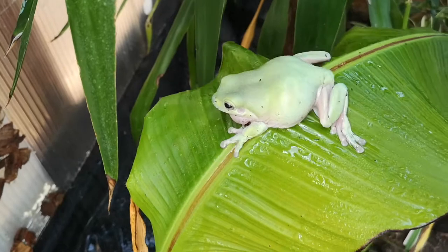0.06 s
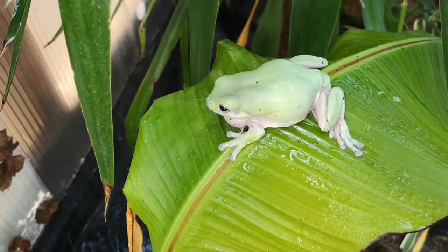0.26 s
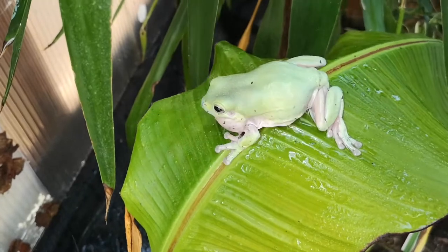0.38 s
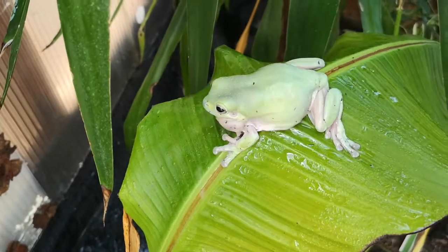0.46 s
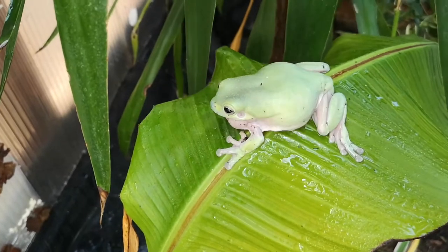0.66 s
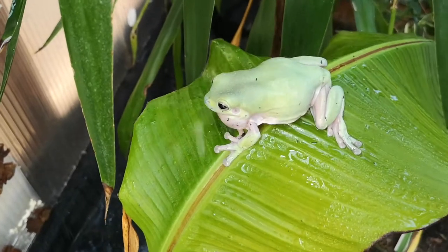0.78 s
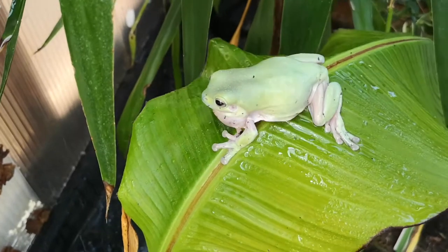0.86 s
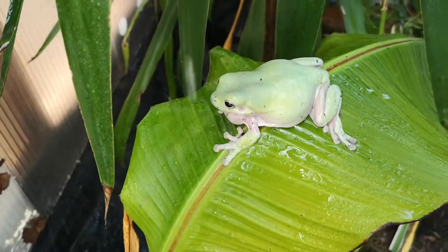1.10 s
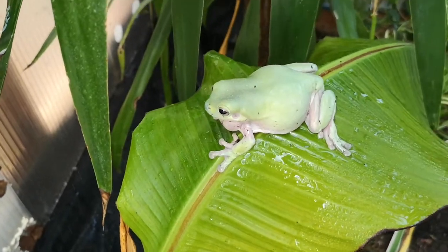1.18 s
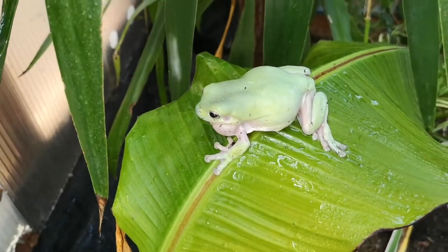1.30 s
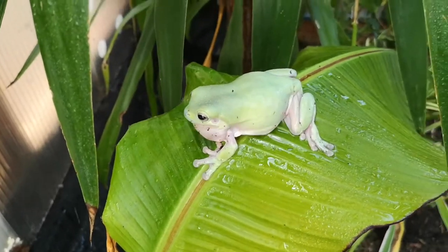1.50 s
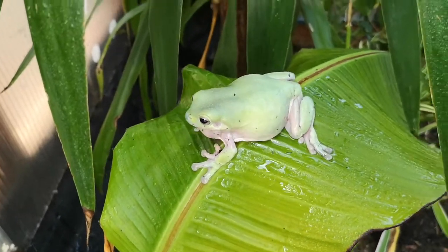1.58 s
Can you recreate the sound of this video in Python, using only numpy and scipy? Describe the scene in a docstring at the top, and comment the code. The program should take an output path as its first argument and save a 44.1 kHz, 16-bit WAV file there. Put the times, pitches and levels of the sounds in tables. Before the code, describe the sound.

A frog gives three short, harsh croaks at even intervals, close to the microphone in a small room. Water hisses steadily behind it, with a few faint splashes between the croaks and a low rumble underneath.

```python
"""A tree frog on a big leaf croaks three times, close to a stereo camera in a small damp room.
Each croak is a train of laryngeal clicks, about 160 a second, that swells, then slows and fades.
The clicks ring throat and vocal sac and come back from nearby surfaces. Water hisses steadily with
a few small splashes; a low rumble drifts under it. The camera's gain dips under each croak."""
import sys
import numpy as np
from scipy import signal
from scipy.fft import rfft, irfft, next_fast_len
from scipy.io import wavfile
from scipy.ndimage import uniform_filter1d

SR = 44100
rng = np.random.default_rng(int(sys.argv[2]) if len(sys.argv) > 2 else 0)


def generate_wav(signal):
    """Clip the signal to [-1, 1] and save it as 16-bit WAV at the path in sys.argv[1]."""
    frames = np.transpose(np.atleast_2d(signal))
    scaled = np.clip(frames, -1, 1) * 32767
    pcm = np.round(scaled).astype(np.int16)
    wavfile.write(sys.argv[1], SR, pcm)


N = 72765


def frog():
    """Three croaks in the room; the right microphone gets them later, coloured by the leaf."""
    # per croak: t/s, click rate/Hz
    rates = [
        [(0.1623, 103.5), (0.2301, 188.4), (0.2366, 133.0), (0.2533, 139.4), (0.2654, 186.3), (0.2791, 165.7),
         (0.2946, 163.5), (0.2995, 174.1), (0.314, 179.5), (0.3314, 155.6), (0.3518, 109.0), (0.383, 72.5)],
        [(0.6389, 117.7), (0.6967, 120.8), (0.7047, 225.5), (0.7189, 107.7), (0.7409, 157.0), (0.7498, 147.0),
         (0.7554, 167.1), (0.7592, 182.3), (0.768, 166.3), (0.7947, 168.3), (0.8071, 87.0), (0.866, 81.0)],
        [(1.206, 93.4), (1.2483, 179.2), (1.2543, 124.6), (1.2726, 131.1), (1.2826, 185.3), (1.3113, 130.3),
         (1.3191, 163.0), (1.3298, 171.9), (1.3364, 160.6), (1.3684, 140.2), (1.3938, 132.3), (1.437, 77.4)],
    ]
    # per croak: t/s, throat level/dB, rasp re throat/dB, sac re throat/dB (all before trims)
    efforts = [
        [(.15, -61, -16, 3), (.168, -38.5, -31, -6), (.207, -46.5, -33, 7), (.221, -26, -17.5, -6.5),
         (.274, -15.5, -17, -11.5), (.333, -23, -13, -5.5), (.344, -37.5, -15, -2.5), (.372, -39.5, -29, -0.5),
         (.385, -68, -11, -4)],
        [(.637, -49, -18, 8), (.682, -35.5, -19, -1.5), (.698, -19.5, -16.5, -11.5), (.732, -17.5, -16.5, -7.5),
         (.765, -15.5, -13, -11.5), (.797, -21.5, -13, -2.5), (.807, -32.5, -11, -1), (.822, -28, -9, -1),
         (.864, -49.5, -2, -1)],
        [(1.205, -52, -10, 2), (1.228, -36, -22, -13), (1.238, -28, -16, -9.5), (1.258, -24.5, -13.5, -10),
         (1.28, -18, -17, -9.5), (1.328, -20.5, -16, -3), (1.36, -28.5, -9, 1.5), (1.399, -32, -13.5, 3),
         (1.406, -51, -7, -8), (1.418, -35, -7, -14), (1.432, -52, -15, 3)],
    ]
    # span of each croak in which the larynx snaps cleanly: from/s, to/s
    firm_spans = [(.204, .352), (.686, .836), (1.228, 1.387)]
    # leaf reflection: f/Hz, gain/dB
    leaf_colour = [(480, 1.5), (660, -3.5), (800, -8), (930, -14.5), (1100, -1), (1330, 4.5), (1600, -1.5),
                   (1880, 1), (2100, 1.5), (2330, -14), (2800, -7.5), (3200, -3.5), (3420, -3.5),
                   (3800, -4.5)]
    # echoes off nearby surfaces: delay/s, gain
    walls_left = [(.00376, -0.12), (.00834, 0.16), (.00934, .11), (.01023, .14), (.02175, -.09)]
    walls_right = [(.00465, 0.21), (.00633, 0.051), (.00925, 0.14), (0.0163, -.18), (0.023, -0.18)]
    right_lag_s = .00008
    left = sum(croak(*call) for call in zip(rates, efforts, firm_spans))
    right = filtered(through(left, ring(leaf_colour)), lambda hz: delay(hz, right_lag_s))
    return np.array([room(left, walls_left), room(right, walls_right)])


def croak(rate, effort, firm_span):
    """Laryngeal clicks ring throat, vocal sac and upper resonances; a slack larynx makes them airy."""
    # resonances: f/Hz, gain/dB
    throat = [(250, -41), (450, -28.5), (750, -23), (1000, 0), (1200, 3), (1550, 1), (1830, -3),
              (2080, -24.5), (2800, -31.5), (4500, -36.5), (8000, -83.5)]
    sac = [(250, -40), (440, -23), (560, -1), (680, 1), (930, -1), (1250, -19), (3000, -34), (8000, -78)]
    rasp = [(900, -52.5), (2050, -3), (2300, -5), (2530, -.5), (2900, -8.5), (3200, -1.5), (3420, 0),
            (3620, -11.5), (4300, -28), (8000, -57)]
    # brief bright resonances: t/s, Gaussian width/s, centre/Hz, level/dB
    flares = [(0.225, 0.012, 2120, -24), (0.348, 0.011, 1880, -32), (0.691, 0.012, 2090, -26),
              (0.821, 0.01, 2090, -36), (1.311, 0.0095, 2476, -25), (1.341, 0.019, 2190, -27),
              (1.391, 0.0084, 2030, -33)]
    # flare spectrum: f/centre, gain/dB
    flare_shape = [(.25, -53.5), (.7, -17), (.88, 1), (1.22, 0), (1.45, -22.5), (3.5, -70)]
    throat_trim_db, sac_trim_db, rasp_trim_db = -.5, 4.5, 4
    click_lead_s, sac_lead_s, rasp_lag_s = .000838, .000419, .00018
    jitter_s, scatter_db = .00003, .35
    firm_air, rasp_air, slack_air = .015, .16, .85  # turbulent share of click energy
    sag = .029  # throat tuning fades from this share sharp to this share flat

    knots_s, rate_hz = np.transpose(rate)
    times = click_times(knots_s, rate_hz)
    jitter, level_scatter, rasp_scatter = rng.standard_normal((SR // 100, 3))[:len(times)].T
    times = times + jitter_s * jitter - click_lead_s
    effort_s, *columns = np.transpose(effort)
    level_db, rasp_rel_db, sac_rel_db = [np.interp(times, effort_s, column) for column in columns]
    level_db += scatter_db * level_scatter
    throat_gain = amp(level_db + throat_trim_db)
    sac_gain = amp(level_db + sac_rel_db + sac_trim_db)
    rasp_gain = amp(level_db + rasp_rel_db + rasp_trim_db + scatter_db * rasp_scatter)
    from_s, to_s = firm_span
    slack = (times < from_s) | (times > to_s)
    progress = np.clip((times - from_s) / (to_s - from_s), 0, 1)
    parts = [(tuned(throat, 1 + sag), throat_gain * (1 - progress), firm_air, 0),
             (tuned(throat, 1 - sag), throat_gain * progress, firm_air, 0),
             (sac, sac_gain, firm_air, -sac_lead_s),
             (rasp, rasp_gain, rasp_air, rasp_lag_s)]
    for at_s, width_s, centre_hz, db in flares:
        if knots_s[0] < at_s < knots_s[-1]:
            swell = np.exp(-((times - at_s) / width_s) ** 2 / 2)
            parts.append((tuned(flare_shape, centre_hz), amp(db) * swell, firm_air, 0))
    weight = np.sqrt(SR / np.interp(times, knots_s, rate_hz))  # power independent of click rate
    return sum(larynx(times + lag_s, weight * gain, np.where(slack, slack_air, air), colour)
               for colour, gain, air, lag_s in parts)


def click_times(knots_s, rate_hz):
    """One click per cycle of the larynx, in s."""
    t = np.arange(knots_s[0], knots_s[-1] + .002, 1 / SR)
    cycles = np.cumsum(np.interp(t, knots_s, rate_hz)) / SR
    return np.interp(np.arange(int(cycles[-1]) + 1), cycles, t)


def larynx(times, sizes, air_share, colour, puff_decay_s=.0033):
    """Snaps, each with a dying puff of turbulence, drive one resonance."""
    snaps = impulses(times, sizes * np.sqrt(1 - air_share))
    puff = np.exp(-np.arange(SR // 50) / (SR * puff_decay_s))
    flow = through(impulses(times, sizes * np.sqrt(air_share)), unit_energy(puff))
    return through(snaps + flow * rng.standard_normal(N), unit_energy(ring(colour)))


def room(x, walls, tail_db=-6, t60_s=.13, gap_s=.0032):
    """Direct sound, early echoes and a short diffuse tail at one microphone."""
    t = np.arange(SR // 2) / SR
    tail = rng.standard_normal(len(t)) * amp(-60 * t / t60_s) * (t > gap_s)
    early = filtered(x, lambda hz: sum(gain * delay(hz, lag_s) for lag_s, gain in walls))
    return x + early + amp(tail_db) * through(x, unit_energy(tail))


def water(level_db=-45):
    """Steady hiss, its bands leaning left or right."""
    # f/Hz, relative density/dB
    spectrum = [(150, 0.5), (330, -1.5), (700, -0.5), (1250, -0.5), (1750, 4), (2400, -0.5), (3300, -4),
                (4600, -7.5), (5700, -2), (6500, -5.5), (7600, -1.5), (9400, -4), (10800, -16),
                (15000, -18.5)]
    # f/Hz, left over right/dB
    pan = [(350, -1), (700, 6), (1500, -0.5), (8200, 1.5), (9800, -4.5), (12000, -1.5)]
    hiss = amp(level_db) * stereo_noise(lambda hz: along(spectrum, hz), patchy_db=2)
    return filtered(hiss, lambda hz: amp(np.outer([.5, -.5], along(pan, hz))))


def splashes(half_band_oct=.5):
    """Small splashes: noise bands that rise fast and die more slowly."""
    # start/s, rise/s, centre/Hz, level/dB
    bursts = [(.563, .01, 5200, -48.5), (.56, .014, 1000, -53), (.988, .006, 5500, -47),
              (1.0, .02, 1650, -51), (1.045, .015, 1400, -50), (1.085, .025, 1150, -52),
              (1.135, .015, 2500, -50.5)]
    t = np.arange(N) / SR
    out = np.zeros((2, N))
    for start_s, rise_s, centre_hz, db in bursts:
        age = np.maximum(t - start_s, 0) / rise_s
        band_db = lambda hz: -10 * np.log10(1 + (np.log2((hz + 1) / centre_hz) / half_band_oct) ** 4)
        out += amp(db) * age * np.exp(1 - age) * stereo_noise(band_db, patchy_db=3)
    return out


def rumble():
    """Low drifting noise, nearly the same at both microphones."""
    # f/Hz, relative density/dB
    spectrum = [(5, -8), (13, 5), (36, -6), (60, -11), (110, -18), (260, -21), (900, -41)]
    # t/s, level/dB
    drift = [(0, -43.5), (.38, -46), (0.539, -41), (0.721, -42), (1, -40), (1.28, -45.5), (1.65, -42)]
    level_db = np.interp(np.arange(N) / SR, *np.transpose(drift))
    return amp(level_db) * stereo_noise(lambda hz: along(spectrum, hz), patchy_db=2.5)


def stereo_noise(colour_db, patchy_db):
    """Coloured noise with time-frequency patches of random gain; mid signal at rms 1."""
    # f/Hz, left-right coherence
    coherence = [(60, 1), (150, 1), (350, 0.31), (800, 0.05), (2000, 0.023), (10000, 0.019)]
    spectra = signal.stft(rng.standard_normal((2, N)), nperseg=512)[2]
    patches = uniform_filter1d(rng.standard_normal(spectra.shape[1:]), size=7, axis=0)
    patches = uniform_filter1d(patches, size=8, axis=1)
    patches /= np.sqrt(np.mean(patches ** 2))
    pair = signal.istft(spectra * amp(patchy_db * patches), nperseg=512)[1][:, :N]
    angle = lambda hz: np.arccos(along(coherence, hz)) / 2
    mid, side = filtered(pair, lambda hz: amp(colour_db(hz)) * [np.cos(angle(hz)), np.sin(angle(hz))])
    return np.array([mid + side, mid - side]) / np.std(mid)


def amp(db):
    """dB to gain."""
    return 10 ** (np.asarray(db) / 20)


def unit_energy(x):
    """x with a sum of squares of 1."""
    return x / np.linalg.norm(x)


def along(points, hz):
    """Interpolate (f/Hz, value) points on a log axis."""
    knots_hz, values = np.transpose(points)
    return np.interp(np.log(hz + 1), np.log(knots_hz + 1), values)


def tuned(colour, factor):
    """(f/Hz, gain/dB) points scaled in frequency."""
    return np.multiply(colour, [factor, 1])


def delay(hz, lag_s):
    """Frequency response of a pure delay."""
    return np.exp(-2j * np.pi * hz * lag_s)


def filtered(x, response):
    """x through a complex frequency response."""
    size = next_fast_len(N + SR // 2)
    return irfft(rfft(x, size) * response(np.fft.rfftfreq(size, 1 / SR)), size)[..., :N]


def ring(colour, size=4096):
    """Minimum-phase impulse response from (f/Hz, gain/dB) points."""
    cepstrum = irfft(np.log(amp(along(colour, np.fft.rfftfreq(size, 1 / SR)))))
    cepstrum[1:size // 2] *= 2
    cepstrum[size // 2 + 1:] = 0
    return irfft(np.exp(rfft(cepstrum)))


def through(x, response):
    """x convolved with an impulse response."""
    return signal.fftconvolve(x, response)[:N]


def impulses(times, sizes, half_taps=8):
    """Band-limited clicks at sub-sample times."""
    at = times[:, None] * SR
    index = np.floor(at).astype(int) + np.arange(1 - half_taps, half_taps + 1)
    shape = np.sinc(index - at) * np.cos(np.pi * (index - at) / (2 * half_taps)) ** 2
    return np.bincount(np.clip(index, 0, N).ravel(), (shape * sizes[:, None]).ravel(), N + 1)[:N]


def scene():
    """Frog over water and rumble."""
    return frog() + water() + splashes() + rumble()


def record(dry):
    """The camera turns its gain down a little under each croak and cuts all above its band limit."""
    knee_db, cut_db_per_db, response_s, top_hz = -33, .19, .057, 15250
    pole = np.exp(-1 / (SR * response_s))
    power = signal.lfilter([1 - pole], [1, -pole], np.mean(dry ** 2, axis=0))
    over_db = np.maximum(10 * np.log10(power + 1e-12) - knee_db, 0)
    return filtered(dry * amp(-cut_db_per_db * over_db), lambda hz: hz < top_hz)


dry = scene()
out = record(dry)
generate_wav(out)
```